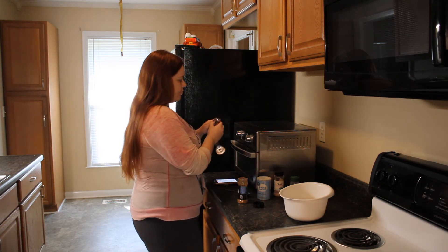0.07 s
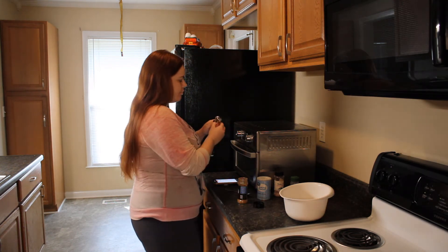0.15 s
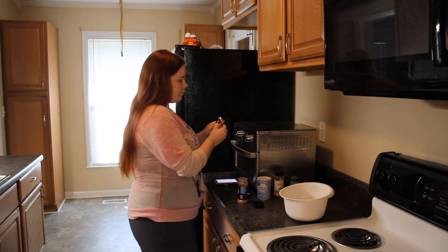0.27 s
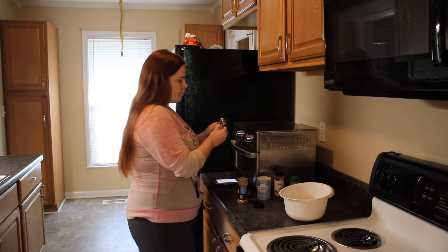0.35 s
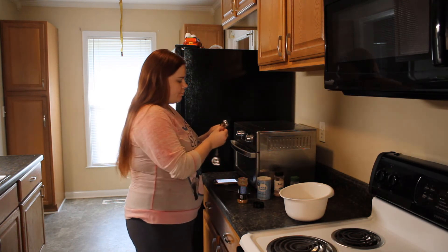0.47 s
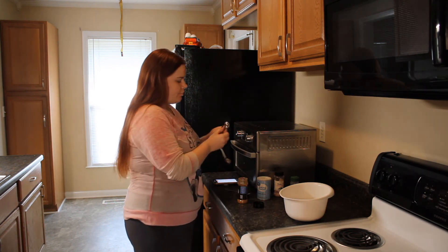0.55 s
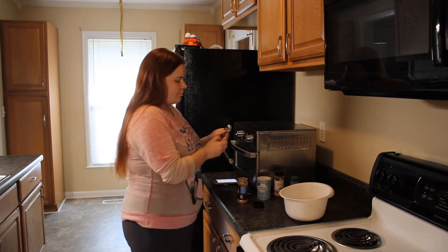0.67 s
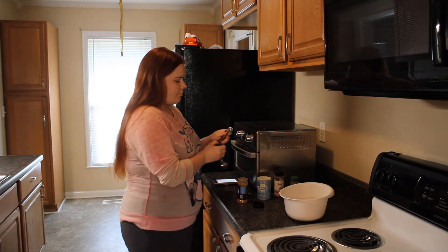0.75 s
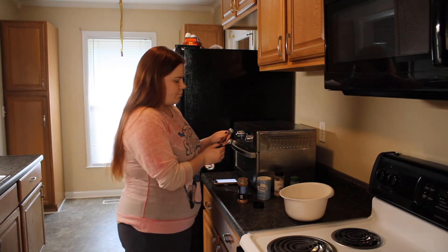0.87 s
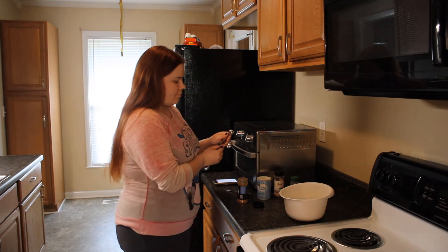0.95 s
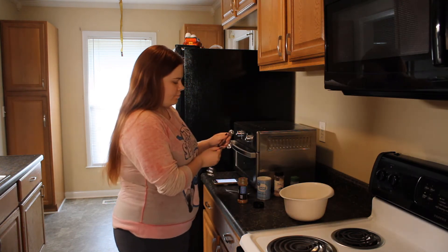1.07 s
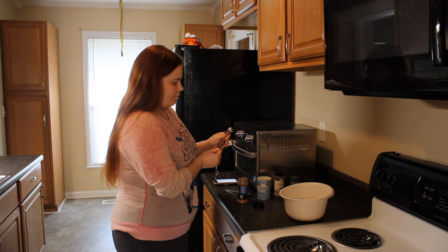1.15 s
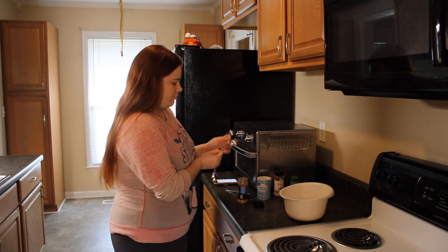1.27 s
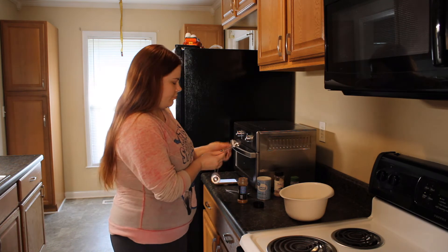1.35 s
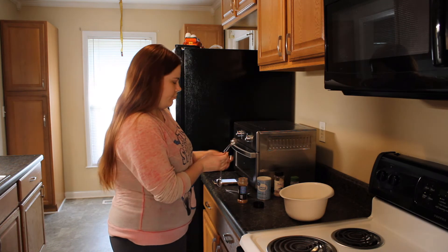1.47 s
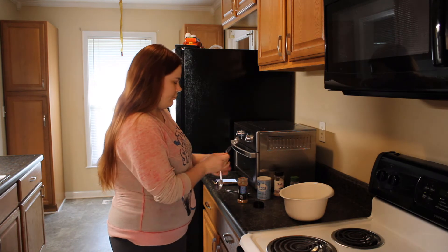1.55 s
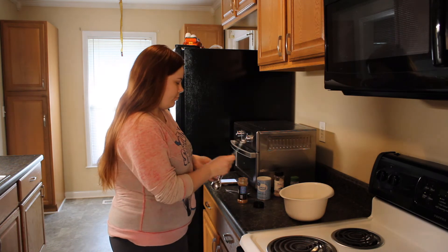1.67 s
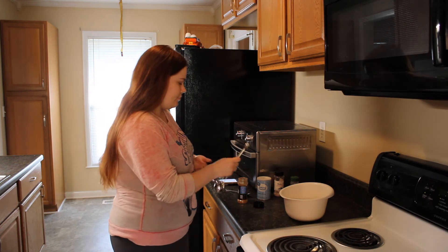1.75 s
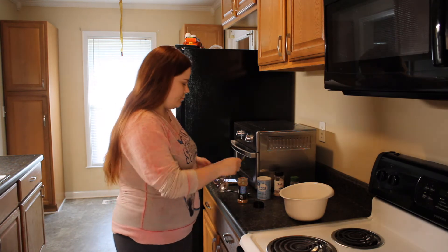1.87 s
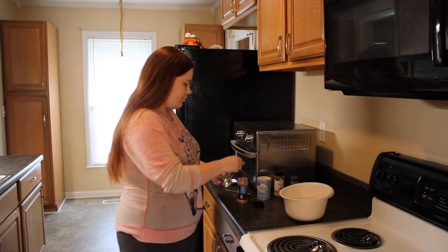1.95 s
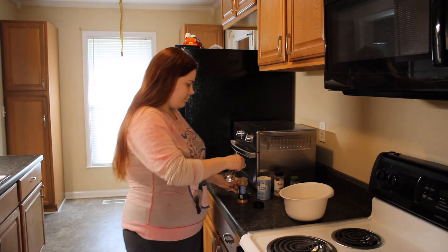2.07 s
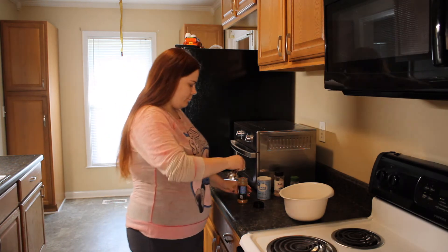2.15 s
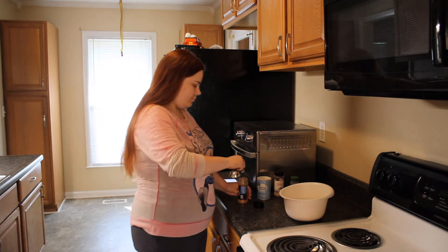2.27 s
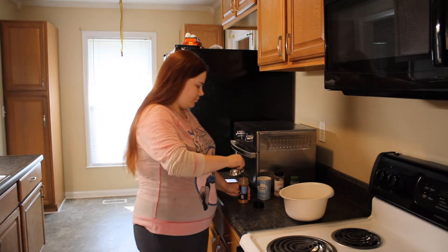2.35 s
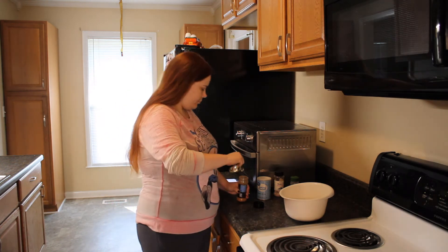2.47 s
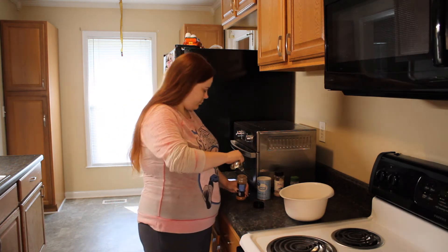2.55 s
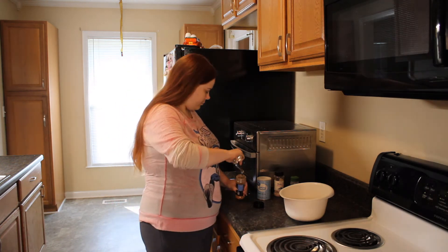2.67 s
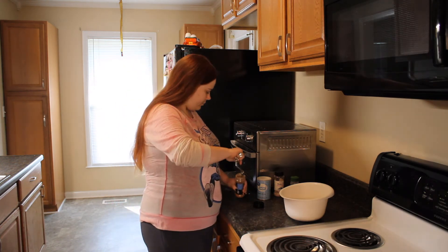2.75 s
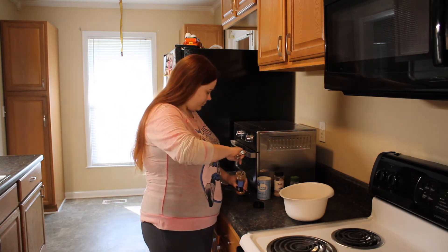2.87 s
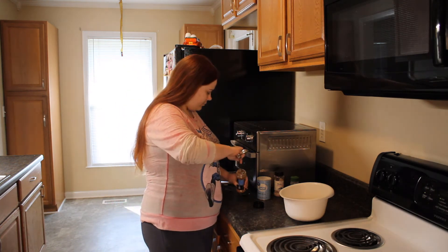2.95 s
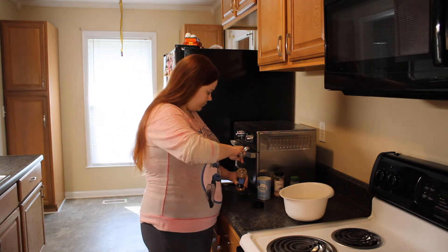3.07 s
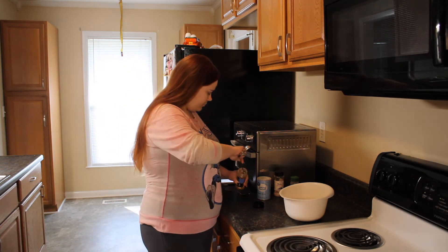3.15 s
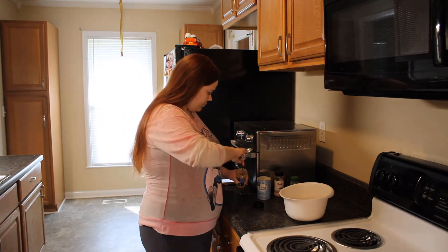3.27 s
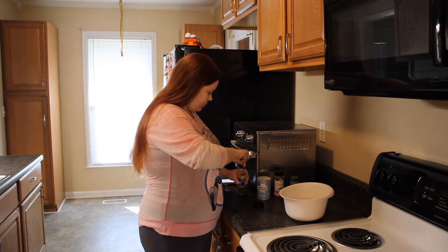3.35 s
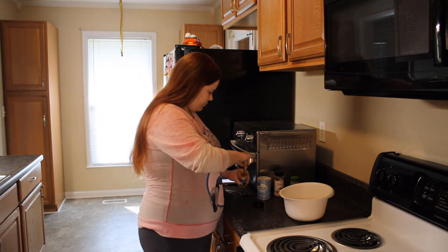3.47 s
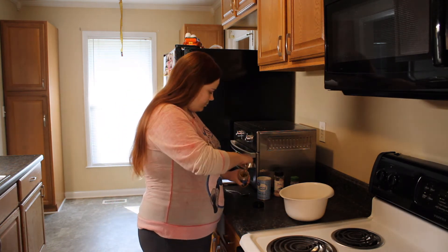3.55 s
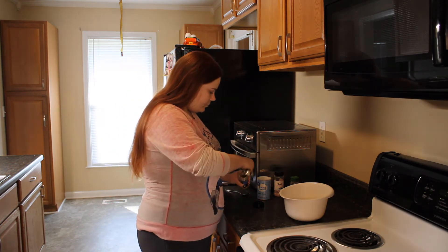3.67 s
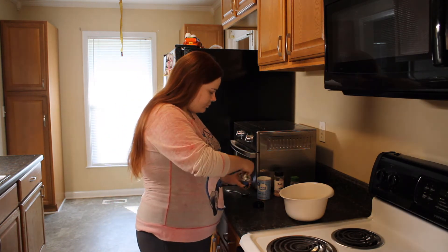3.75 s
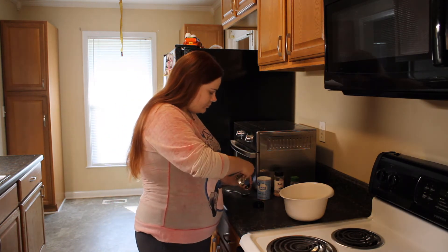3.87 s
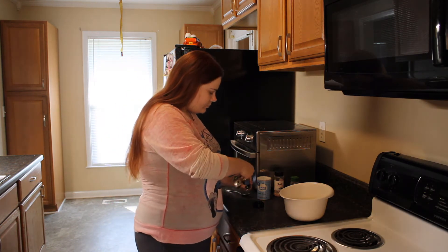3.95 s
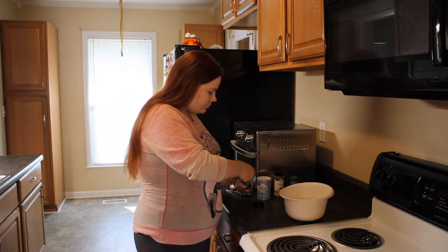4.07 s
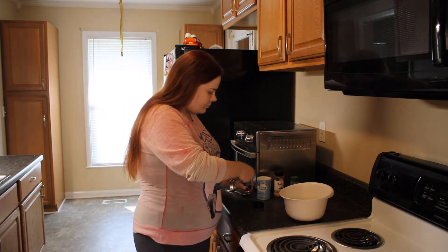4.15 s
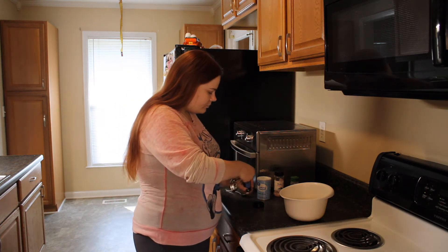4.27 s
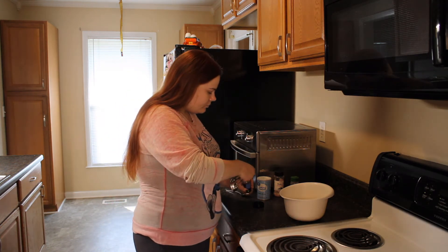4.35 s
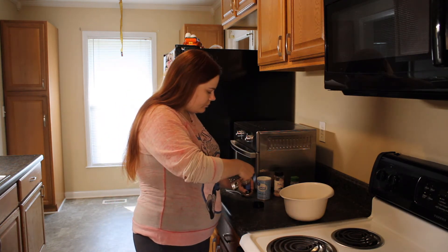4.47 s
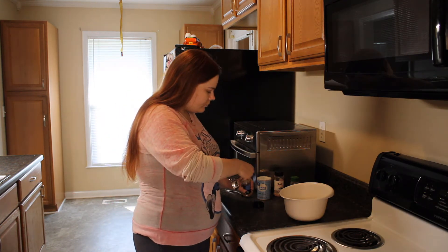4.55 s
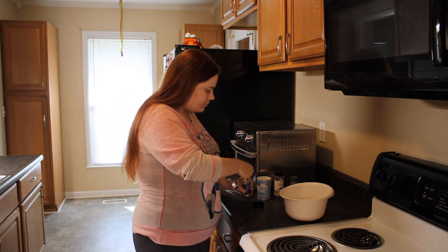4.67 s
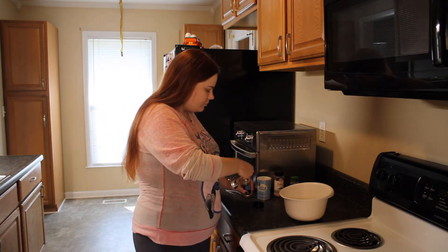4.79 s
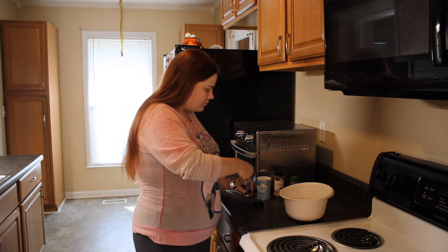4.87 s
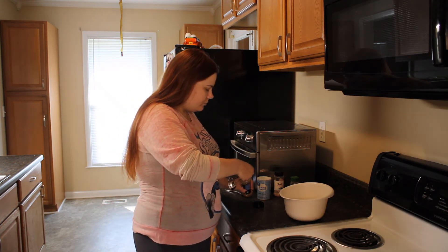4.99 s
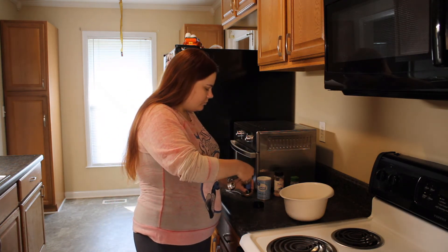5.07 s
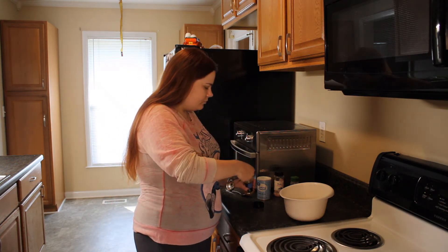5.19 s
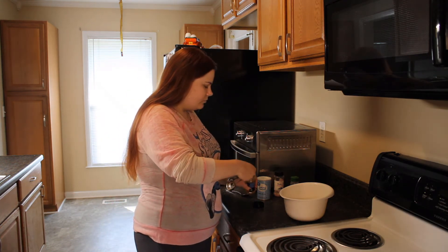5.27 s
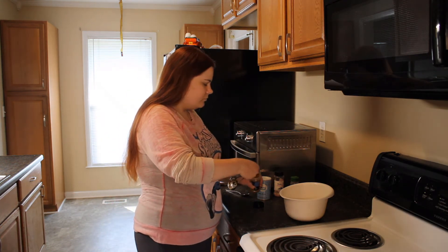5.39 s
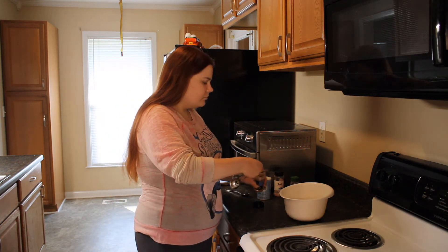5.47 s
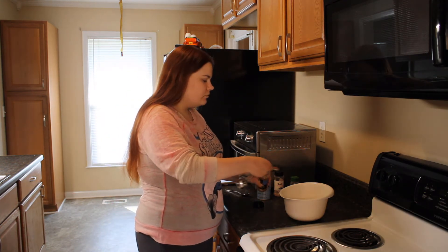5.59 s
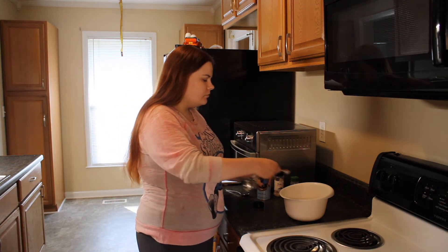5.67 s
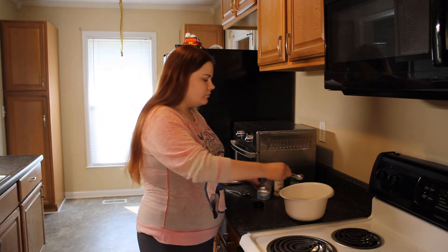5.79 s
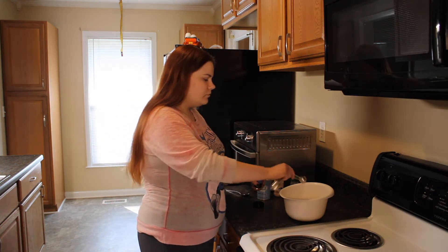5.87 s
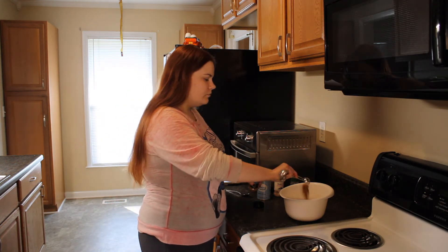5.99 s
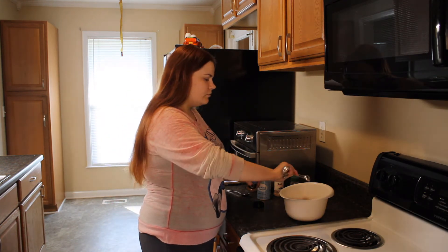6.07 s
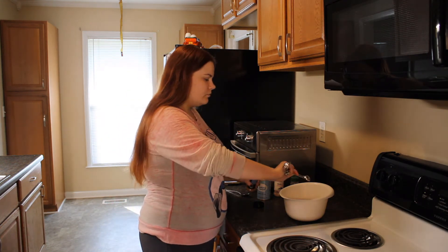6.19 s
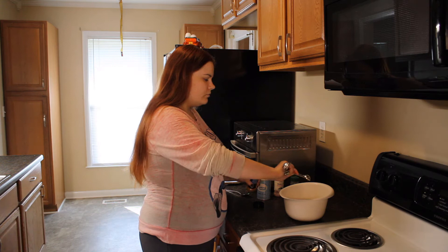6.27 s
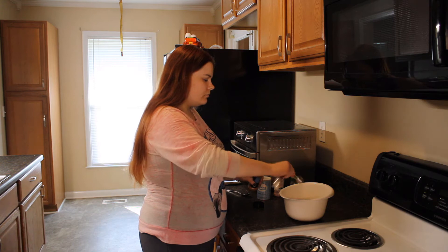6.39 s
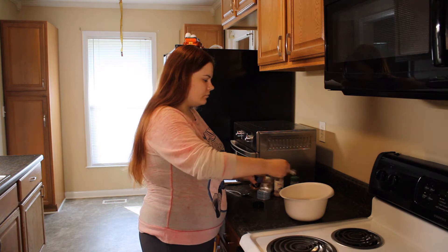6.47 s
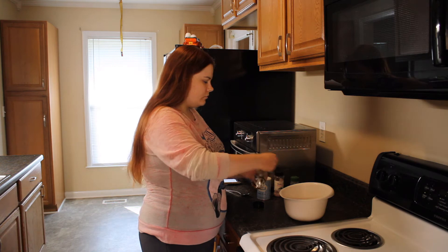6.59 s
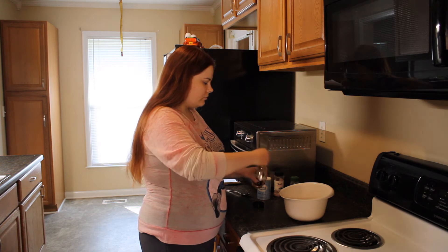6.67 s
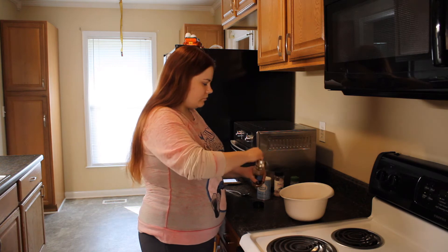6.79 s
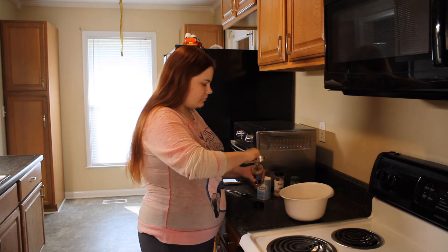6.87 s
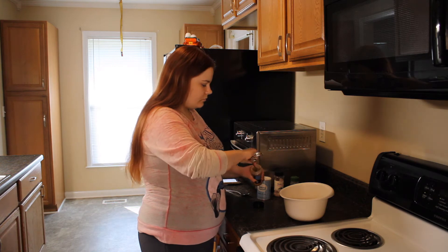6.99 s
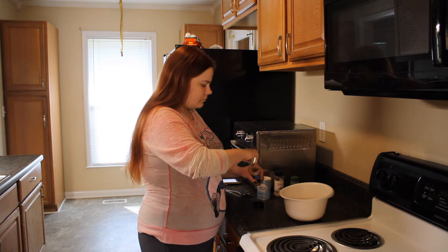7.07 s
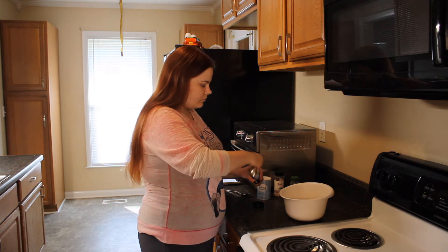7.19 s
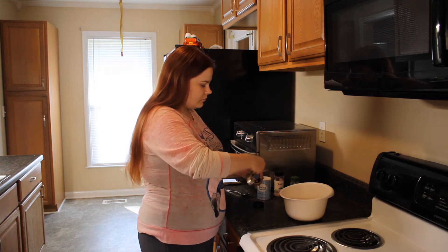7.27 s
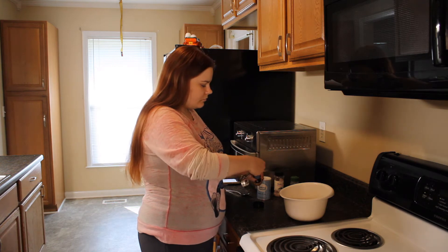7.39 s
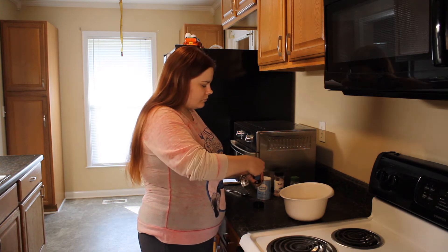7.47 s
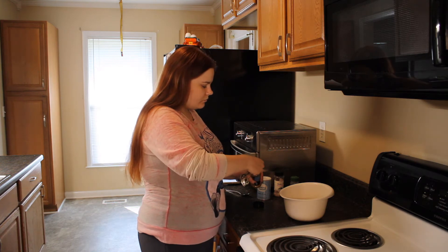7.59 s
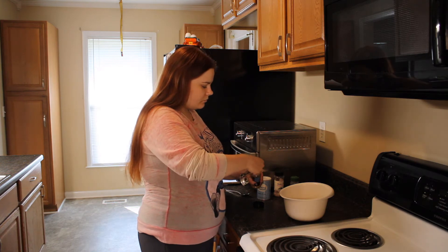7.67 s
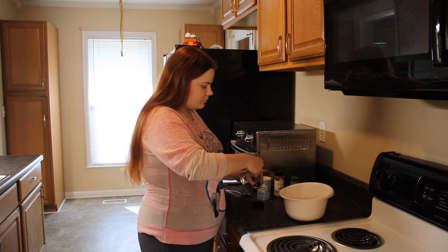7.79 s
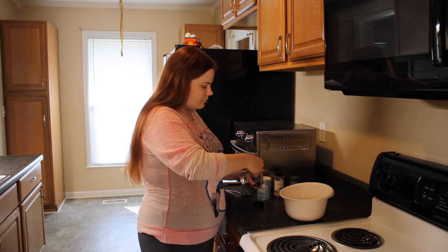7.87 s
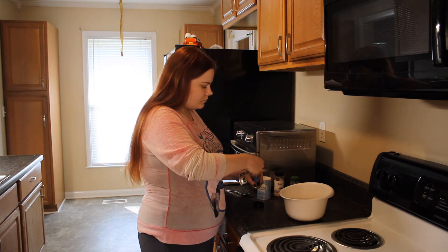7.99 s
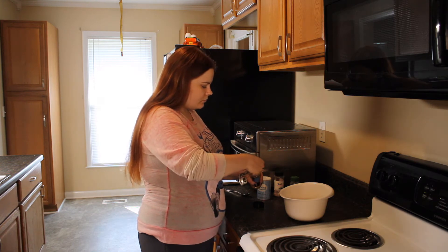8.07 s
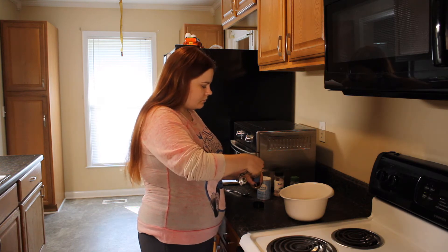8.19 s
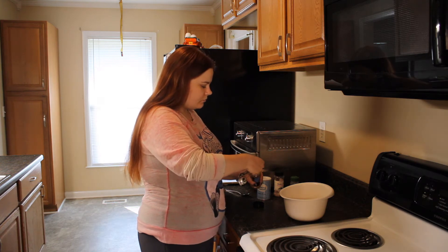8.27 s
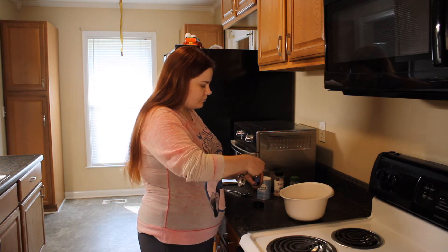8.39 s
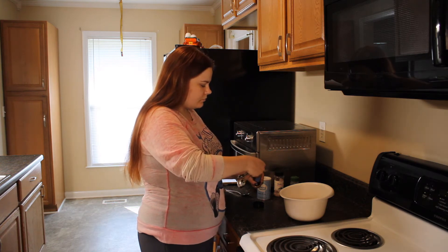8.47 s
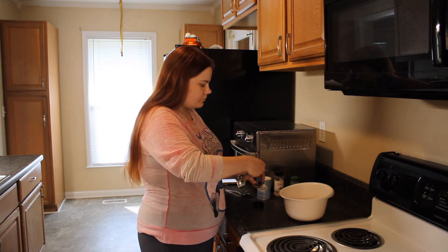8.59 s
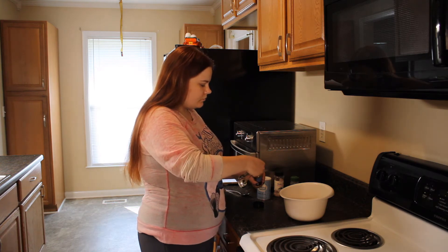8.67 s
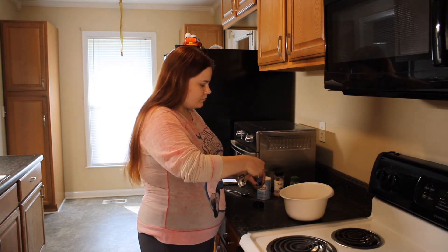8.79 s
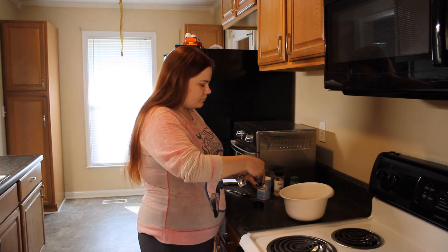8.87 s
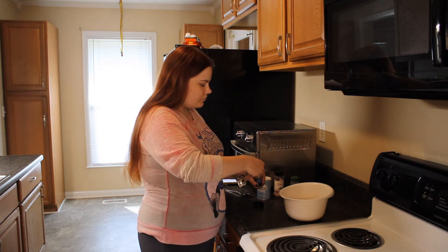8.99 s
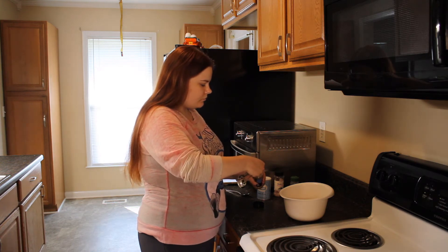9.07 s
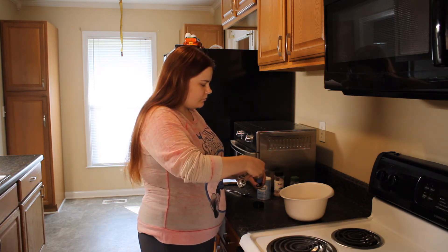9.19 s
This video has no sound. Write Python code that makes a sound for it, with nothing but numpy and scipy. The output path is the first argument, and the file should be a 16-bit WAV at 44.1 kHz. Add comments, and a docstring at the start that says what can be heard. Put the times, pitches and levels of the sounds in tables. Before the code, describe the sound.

A burst of steel spoon clinks peaks early, followed by scattered jar clicks and counter thuds over soft sleeve rustle and refrigerator hum.

```python
"""A ring of six steel measuring spoons jangles in a kitchen: bright cracks with beating, dying sine modes.
Jars and lids are knocked about on a stone counter: runs of contacts drive a thud, a snap and a short ring.
Low cabinet bumps, faint whistles and patchy sleeve noise fill in; a refrigerator hums in steady sines over
shaped hiss. The hard room answers every hit with sparse random echoes."""
import sys
import numpy as np
from scipy import signal
from scipy.fft import rfft, irfft
from scipy.io import wavfile
from scipy.ndimage import uniform_filter1d

SR = 44100
rng = np.random.default_rng(int(sys.argv[2]) if len(sys.argv) > 2 else 0)


def gain_from_decibels(decibels):
    """Convert decibel values to linear amplitude factors."""
    exponent = np.asarray(decibels, float) / 20
    return 10 ** exponent


def put_to_file(sound):
    """Save the sound as 16-bit audio at rate SR, in the file named by the first command-line argument."""
    columns = np.atleast_2d(sound).T  # one column per channel
    safe = np.clip(columns, -1, 1)
    whole_steps = np.round(safe * 32767)
    wavfile.write(sys.argv[1], SR, whole_steps.astype(np.int16))


N = 407043  # length in samples
HZ = np.fft.rfftfreq(1024, 1 / SR)  # frequency bins of every drawn spectrum


def unit(x):
    """Scales a sound to energy 1."""
    return x / np.sqrt(np.sum(x ** 2) + 1e-20)


def read(points, hz):
    """Reads a curve of (Hz, value) points on a log-frequency axis."""
    f, value = np.transpose(points)
    return np.interp(np.log(hz + 1), np.log(f + 1), value)


def add(mix, start_s, sound):
    """Mixes a sound in at its start time, cut off at the end of the mix."""
    part = mix[round(start_s * SR):][:len(sound)]
    part += sound[:len(part)]


def click(spectrum_db):
    """The causal, minimum-phase impulse with the given spectrum on HZ."""
    mirrored_db = np.r_[spectrum_db, spectrum_db[-2:0:-1]]
    log_gain = np.log(gain_from_decibels(mirrored_db))
    return np.fft.ifft(np.exp(signal.hilbert(log_gain).conj())).real[:512]


def ring(hz, level_db, t60_s):
    """Dying sines after one blow, a column a mode; the contact takes a fraction of a millisecond."""
    t = np.arange(SR // 3)[:, None] / SR
    contact = 1 - np.exp(-(t / 0.00047) ** 2)
    decay = gain_from_decibels(level_db - 60 * t / np.clip(t60_s, .003, .3))
    return contact * decay * np.sin(2 * np.pi * hz * t)


def chatter(seconds, fade_db, spread_db, count):
    """A blow is a quick run of uneven contacts, more in a long one, changing by fade_db; its colour is even."""
    when, size, sign = rng.random((count, 3)).T
    when[0], size[0] = 0, .6
    happens = np.arange(count) < 1 + 900 * seconds
    length = int(max(seconds, .0005) * SR) + 2
    contacts = happens * gain_from_decibels(spread_db * size - fade_db * when) * np.sign(sign - .5)
    train = np.zeros(4096)
    np.add.at(train, (when * length).astype(int), contacts)
    z = rfft(train)
    even = irfft(z / np.sqrt(uniform_filter1d(abs(z) ** 2, 40)))
    return unit(even[:length + 100])


def noise(spectrum_db):
    """Noise of rms 1 whose short-time spectrum follows spectrum_db (bins x frames or one column)."""
    a, b = rng.standard_normal((N // 256 + 5, len(HZ), 2)).T
    shaped = (a + 1j * b) * gain_from_decibels(spectrum_db)
    sound = signal.istft(shaped, nperseg=1024, noverlap=768)[1][:N]
    return unit(sound) * np.sqrt(N)


# colour of the room tone and microphone noise: (pitch_hz [Hz], level_db [dB])
HISS_COLOUR = [(20, -7), (40, -7), (70, -18), (150, -7), (210, -11), (240, -13.5), (280, -9.5), (350, -10),
               (520, -13), (1100, -16.5), (3300, -23), (10000, -36.5), (15500, -47)]
HISS_DB = -52.5  # rms


def hiss():
    """Steady noise of the room and the microphone, heaviest in the bass."""
    return gain_from_decibels(HISS_DB) * noise(read(HISS_COLOUR, HZ)[:, None])


# mains harmonics of the compressor: (pitch_hz [Hz], level_db [dB rms before the sway])
HUM = [(120, -77.5), (240, -57.5), (360, -69)]


def fridge():
    """Mains harmonics of the compressor, a little unsteady in level and phase."""
    t = np.arange(N) / SR
    out = np.zeros(N)
    for pitch_hz, level_db in HUM:
        wander = rng.standard_normal((N, 2)).T
        sway, drift = uniform_filter1d(uniform_filter1d(wander, 1500), 1500)
        tone = np.sin(2 * np.pi * pitch_hz * t + 5.0 * drift)
        out += gain_from_decibels(level_db + 60.0 * sway) * np.sqrt(2) * tone
    return out


# level curve of sleeves and fingers moving: (time_s [s], level_db [dB])
RUSTLE = [(0, -58), (1, -61), (2.2, -60.5), (3.05, -63.5), (3.15, -55.5), (3.45, -60), (3.7, -61.5),
          (4.1, -57.5), (5, -68.5), (6.601, -68), (7.05, -58), (7.2, -64.5), (7.33, -59.5), (7.5, -67),
          (8, -65), (8.4, -68), (9.23, -67)]
# colour of cloth and skin: (pitch_hz [Hz], level_db [dB])
RUSTLE_COLOUR = [(300, -15), (1000, -1.5), (2500, 5.5), (6000, 6), (9000, -1.5), (13000, -34)]


def rustle():
    """Sleeves and fingers make bright noise, patchy in time and pitch, that swells and sinks."""
    grain = rng.standard_normal((N // 256 + 5, len(HZ))).T
    patches = uniform_filter1d(uniform_filter1d(grain, 30, 0), 6, 1)
    patches_db = 2.5 * patches / patches.std()
    level_db = np.interp(np.arange(N) / SR, *np.transpose(RUSTLE))
    return gain_from_decibels(level_db) * noise(read(RUSTLE_COLOUR, HZ)[:, None] + patches_db)


def spoon(modes):
    """Every mode is an unequal beating pair, over a much shorter ring while the spoons still touch."""
    hz, level_db = np.transpose(modes)
    split_hz = rng.uniform(48, 130, len(hz))
    free = ring(hz, level_db, .15) + ring(hz - split_hz, level_db - 5, .08)
    touching = ring(hz, level_db + 11.5, 0.014)
    return (free + touching) / (3 * len(hz))


# spoons striking each other: (start_s [s], level_db [dB], chatter_s [s],
# place [spoons round the ring, wrapping], ring_db [dB, ring against crack])
CLINKS = [(.0305, -21.5, .005, 5.5, 3), (.143, -32, .018, 6, -1.5), (.178, -18, .007, .15, 2),
          (.311, -37.5, 0.0037, 5.9, -1), (.401, -38, .0065, 5.6, 3.5), (.568, -33, .034, 7, -3),
          (.6006, -23, .0078, 1.52, 10), (.612, -29, 0.021, 0.48, 5), (.9275, -19.5, .0074, 2.57, 10.5),
          (.95, -28, 0.024, 3.5, 6), (1.14, -37.5, .014, 3.05, 2.5), (1.1524, -20.5, .008, 3.52, 11),
          (1.175, -26, .016, 4.3, 3.5), (1.234, -29, 0.013, 3.2, 7.5), (1.297, -23.5, .0044, 3.46, 9),
          (1.3043, -21, 0.013, 3.8, 7.5), (1.468, -31, 0.0074, 3.68, 22.5), (1.515, -26, 0.027, 4.4, 11),
          (1.565, -21.5, .029, 3.3, 8), (1.607, -19.5, 0.0064, 2.4, 12.5), (1.613, -5.5, .017, 2.27, 8),
          (1.633, -13, .004, 2.1, 14), (1.7595, -12, .005, 2.1, 11.5), (1.7658, -0.5, .0011, 4.63, 3),
          (1.769, -6, 0.0025, 4.97, -5), (1.7733, -16, 0.0018, 7.85, 6), (1.777, -15, .0043, 5.7, -2),
          (1.790, -33, .018, 4.95, 0), (3.779, -34.5, 0.015, 5.05, 6.5), (4.184, -38.5, .0085, 1.45, 7),
          (5.97, -40, .0029, 4.9, 3), (6.296, -47, .0064, 5.05, 4), (7.219, -37.5, .0059, 5.05, 2),
          (7.768, -33.5, 0.02, 5.3, 1.5), (8.112, -34, .012, 4, -9)]
# modes of the steel bowls and handles, a list a spoon: (pitch_hz [Hz], level_db [dB])
SPOONS = [
    [(4090, 3), (4700, 3), (5280, -4), (5500, -15.5), (7100, -13.5), (7645, -1), (9070, -5.5), (10850, -10)],
    [(1360, -11.5), (3630, 3.5), (4300, -5.5), (6750, -6), (7595, -2.5), (9060, -14), (10300, -11.5),
     (13500, -24)],
    [(1650, -15), (3755, -1.5), (4930, 0.5), (5830, -9), (6600, -13.5), (8130, -7), (10280, -25),
     (12150, -19.5), (12600, -18.5)],
    [(3250, -9), (5620, -13), (5985, -3), (6140, 2), (6380, -4), (6612, -14.5), (8720, -11), (9000, -21),
     (10900, -22)],
    [(3690, -9.5), (7000, -3.5), (7350, -19), (7795, 2.5), (8830, -12), (10800, -28), (11500, -18),
     (12000, -14), (14200, -37)],
    [(1790, -10.5), (2900, -2.5), (4500, 4.5), (5600, 1.5), (6500, -10.5), (9150, -12.5), (10800, -15)],
]
# colour of steel on steel: (pitch_hz [Hz], level_db [dB])
CRACK = [(300, -38), (800, -20.5), (1700, -34.5), (2400, -51.5), (3600, -2), (5000, -4.5), (6500, 7),
         (8300, -10), (10000, -22), (12500, -22.5), (15500, -43), (17000, -96.5)]
# where each spoon hangs: (place [spoons round the ring])
HANG = np.array([1, 3, 4, 5, 2, 0])
NEIGHBOUR_DB, FAR_DB = 20, 16.5  # loss one place from the blow (square law), and the most ever lost
LEAST_REACH = .6  # a mode missed by the run of contacts is lifted as if it had this reach
SCATTER_DB = 1.5  # each blow lands elsewhere and favours other modes


def spoons(places):
    """Each clink is a bright crack and the ring of the spoons that hang nearest the blow."""
    crack = click(read(CRACK, HZ))
    crack = crack / abs(crack).max()
    rings = np.hstack([spoon(modes) for modes in SPOONS])
    hz = np.vstack(SPOONS)[:, 0]
    modes_each = [len(modes) for modes in SPOONS]
    for k, (start_s, level_db, chatter_s, place, top_db) in enumerate(CLINKS):
        away = (HANG - place + len(HANG) / 2) % len(HANG) - len(HANG) / 2
        spoon_db = top_db - np.minimum(NEIGHBOUR_DB * away ** 2, FAR_DB)
        fade_db = max(9.0 - 450 * chatter_s, -2.5)  # a sharp blow dies away, a long slide holds
        blows = chatter(chatter_s, fade_db, 17.0, count=24)
        # evens out the energy that the contacts give each mode
        reach = abs(signal.freqz(blows, worN=hz, fs=SR)[1])
        mode_db = np.repeat(spoon_db, modes_each) + SCATTER_DB * rng.standard_normal(len(hz))
        sound = rings @ (gain_from_decibels(mode_db) / np.maximum(reach, LEAST_REACH))
        add(sound, 0, crack)
        add(places[k % 3], start_s, gain_from_decibels(level_db) * signal.fftconvolve(blows, sound))


# decay of the late echoes: (pitch_hz [Hz], t60_s [s])
ROOM = [(300, 0.22), (1500, 0.6), (4000, 0.36), (7000, 0.4), (10000, 0.31), (13000, 0.31), (15500, 0.66)]


def kitchen(x):
    """Sparse taps of random sign, each band dying at its own speed, with the near walls strong at first."""
    taps, at = np.zeros(SR), np.arange(60, SR - 20, 20)
    taps[at + rng.integers(0, 20, len(at))] = rng.choice([-1., 1.], len(at))
    hz, t, z = signal.stft(taps, SR, nperseg=128)
    early = 1 + gain_from_decibels(5.5 - 60 * t / 0.036)
    decay = gain_from_decibels(-60 * t / read(ROOM, hz)[:, None])
    tail = signal.istft(z * early * decay, SR, nperseg=128)[1]
    z = rfft(tail, 2 * SR)
    power = abs(z) ** 2  # a hard, irregular room favours no narrow band
    flatten = np.sqrt(uniform_filter1d(power, 4000) / uniform_filter1d(power, 300))
    echoes = irfft(z * flatten)[:SR]
    return signal.fftconvolve(x, unit(echoes))[:N]


# jars, lids and hands on the counter: (start_s [s], level_db [dB], snap_hz [Hz],
# thud_db [dB over the snap], fall_db [dB per octave above the snap])
KNOCKS = [(1.066, -24.5, 1300, -11, 4.5), (1.445, -23.5, 1300, -15, 0.5), (1.989, -31.5, 1400, -20, 3.5),
          (2.022, -34, 2610, -21, 12), (2.064, -30.5, 1540, -9, 6), (2.132, -23.5, 1400, -16, 5.5),
          (2.164, -30, 2600, -14, 14), (2.573, -36, 2200, -18, 9), (2.896, -28.5, 2200, 14, 15),
          (3.074, -35, 1300, -3.5, 12), (3.268, -29.5, 2280, -23, 11.5), (3.48, -31, 2600, -13, 8),
          (3.548, -33, 2620, -22, 14), (3.941, -24, 1300, 18.5, -0.5), (4.337, -27.5, 3020, 21, 7),
          (4.461, -9, 3480, -1.5, 19.5), (4.539, -15, 3630, 6.5, 18), (4.609, -25, 2600, 10, 13),
          (4.734, -31.5, 2570, 39, 6), (6.786, -22, 1282, 0, 12), (6.845, -18.5, 4350, -4, 23),
          (6.913, -17.5, 7100, 0, -11), (7.6, -34, 1510, 8, 7.5), (7.704, -21.5, 1300, 1, 8.5),
          (7.85, -26.5, 2000, 5.5, 11), (8.087, -14, 2560, 6.5, 7), (8.114, -22.5, 5500, 2, 29.5),
          (8.686, -31, 1300, 4, 10.5), (8.753, -13.5, 4480, 2.5, 29), (8.951, -18.5, 4420, 4, 21),
          (9.088, -19, 4170, 3.5, 24.5)]
# corners of a knock's colour: (pitch_hz [Hz])
PARTS_HZ = [560, 900, 1300, 1800, 2300, 2900, 3600, 4500, 5600, 7500]
# modes of a jar on stone: (pitch_hz [Hz], level_db [dB], t60_s [s])
JAR = [(551, 9, 0.028), (906, -2.5, .016), (1123, 6.5, 0.012), (1690, 1, 0.016), (2375, -4.5, 0.0099),
       (2604, 8, 0.0058), (3360, 2.5, 0.0068), (3850, 12, 0.0055), (4150, -6, 0.0062), (5010, 5, 0.01),
       (6270, 8, .012)]
THUD_FALL_DB = 4  # the thud dies away upwards, per octave squared
SNAP_RISE_DB = 2  # the snap rises to its pitch, per octave
JAR_RING_DB = -38.5  # trim of the jar's ring under the snap
GRIP = .025  # largest share by which the grip shifts a mode of the jar


def jars(places):
    """Each knock is a low thud, a snap at its own pitch and a short ring coloured by both."""
    hz, mode_db, t60_s = np.transpose(JAR)
    for k, (start_s, level_db, snap_hz, thud_db, fall_db) in enumerate(KNOCKS):
        above = np.log2(np.divide(PARTS_HZ, snap_hz))  # octaves over the snap
        snap = gain_from_decibels(np.where(above < 0, SNAP_RISE_DB * above, -fall_db * above))
        octaves = np.log2(np.divide(PARTS_HZ, PARTS_HZ[0]))
        thud = gain_from_decibels(thud_db - THUD_FALL_DB * octaves ** 2)
        part_db = 20 * np.log10(np.hypot(snap, thud))
        colour = [(60, part_db[0] - 40), (330, part_db[0] - 13), *zip(PARTS_HZ, part_db),
                  (11000, part_db[-1] - 17.5), (16000, part_db[-1] - 40.5)]
        held_hz = hz * rng.uniform(1 - GRIP, 1 + GRIP, len(hz))
        sound = ring(held_hz, mode_db + read(colour, hz) + JAR_RING_DB, t60_s).sum(1)
        add(sound, 0, click(read(colour, HZ)))
        sound = sound / abs(sound).max()
        blows = chatter(.008, fade_db=1, spread_db=5.5, count=12)
        add(places[k % 3], start_s, gain_from_decibels(level_db) * signal.fftconvolve(blows, sound))


# low bumps through the cabinet: (start_s [s], level_db [dB], pitch_hz [Hz])
BUMPS = [(3.947, -40, 161), (6.792, -45.5, 200)]


def bumps(mix):
    """A hollow cabinet answers set-downs with one low, dying mode."""
    for start_s, level_db, pitch_hz in BUMPS:
        add(mix, start_s, ring(np.array([pitch_hz]), level_db, t60_s=0.09)[:, 0])


# thin faint whistles: (start_s [s], length_s [s], pitch_hz [Hz], level_db [dB])
WHISTLES = [(5.74, .15, 3430, -77), (6.05, .11, 1300, -66), (8.53, .13, 3450, -74),
            (8.655, .07, 1660, -64.5)]


def whistles(mix):
    """Soft narrow tones that swell, waver in level and pitch, and fade."""
    for start_s, length_s, pitch_hz, level_db in WHISTLES:
        n = int(length_s * SR)
        waver = uniform_filter1d(rng.standard_normal(SR // 2), 600)[:n]
        phase = 2 * np.pi * np.cumsum(pitch_hz * (1 + .6 * waver)) / SR
        tone = (1 + 18 * waver) * np.sin(phase)
        add(mix, start_s, gain_from_decibels(level_db) * np.sqrt(2) * tone * signal.windows.tukey(n, .4))


def scene():
    """Hits take turns between three places, each with its own echoes, over a floor of hiss, hum and rustle."""
    places = np.zeros((3, N))
    spoons(places)
    jars(places)
    whistles(places[0])
    bumps(places[1])
    wet = sum(kitchen(x) for x in places)
    floor = hiss() + fridge() + rustle()
    return (gain_from_decibels(1.5) * places.sum(0) + gain_from_decibels(3.5) * wet + floor)[None]


def top_cut(x):
    """Nothing passes above the cut-off."""
    return signal.sosfilt(signal.butter(12, 15690, fs=SR, output="sos"), x)


def record(dry):
    """The input stage rounds off peaks softly towards its ceiling, then a low-pass limits the band."""
    ceiling = .93  # full scale is 1
    soft = dry / (1 + abs(dry / ceiling) ** 6) ** (1 / 6)
    low_pass = signal.firwin(255, 15650, window=("kaiser", 8), fs=SR)
    mix = signal.oaconvolve(soft, low_pass[None], "same")
    return top_cut(mix)


dry = scene()
out = record(dry)
put_to_file(out)
```